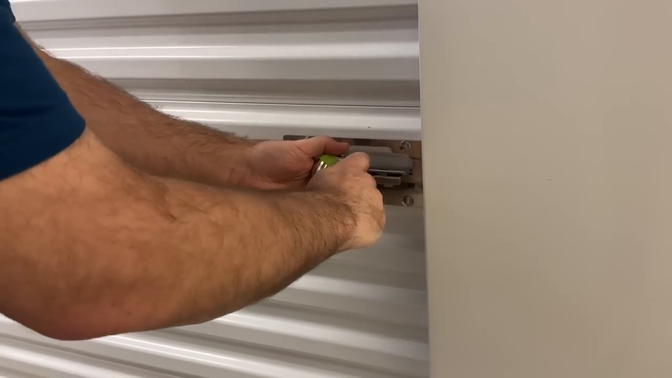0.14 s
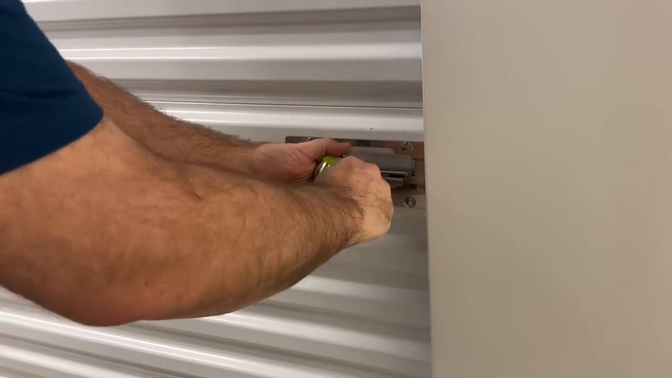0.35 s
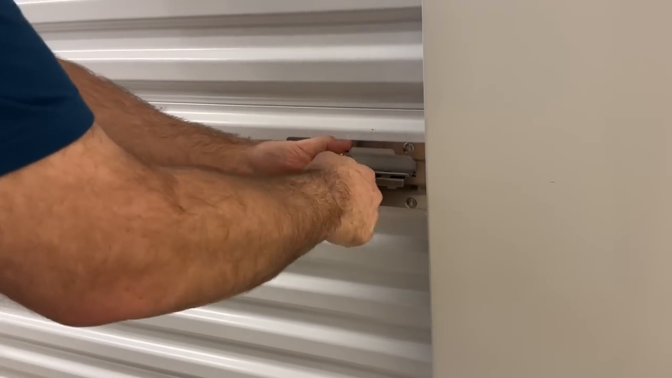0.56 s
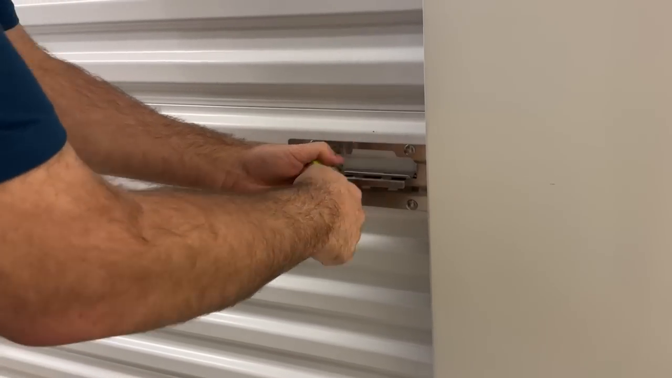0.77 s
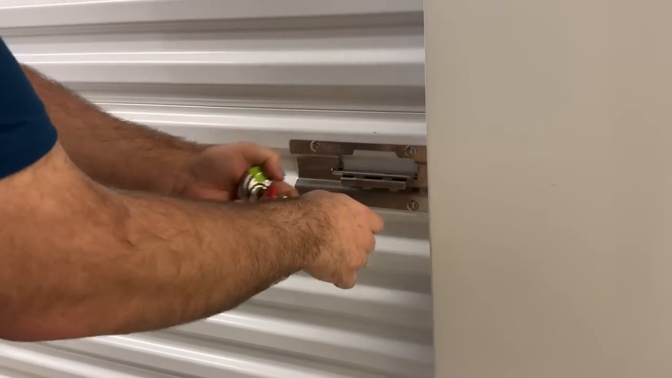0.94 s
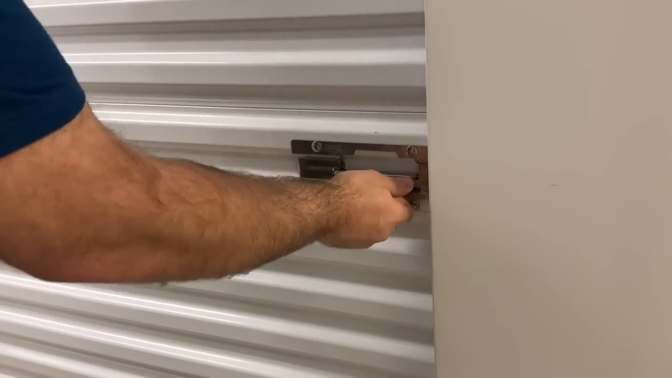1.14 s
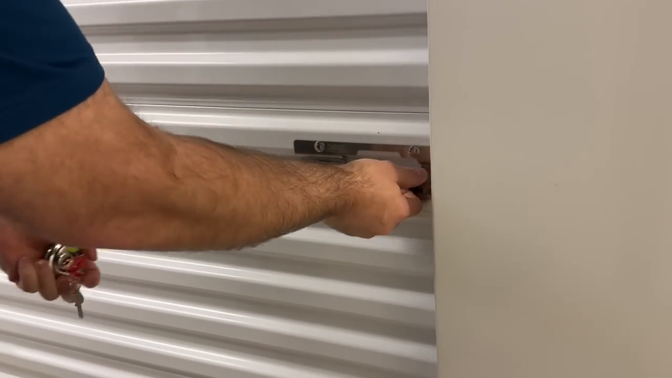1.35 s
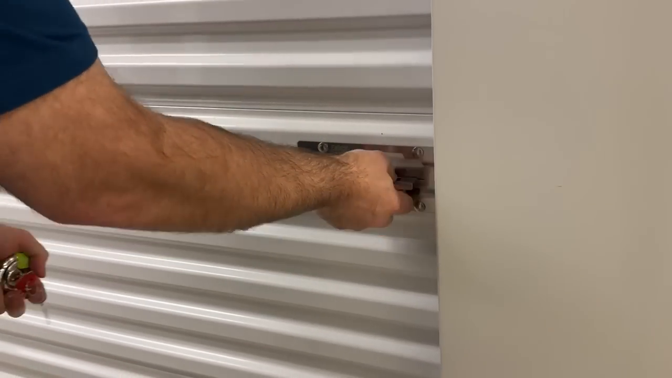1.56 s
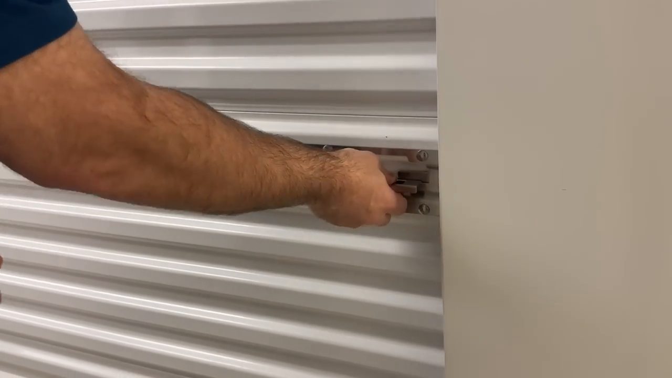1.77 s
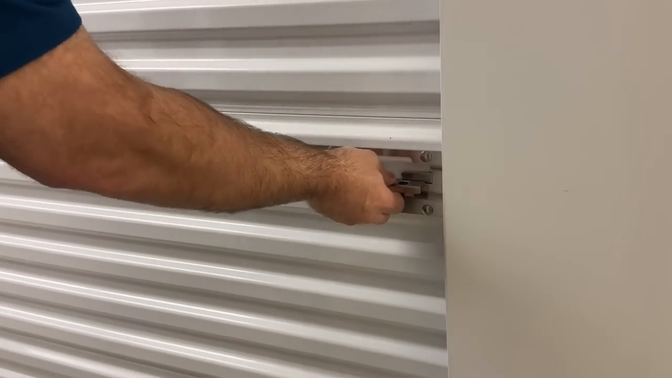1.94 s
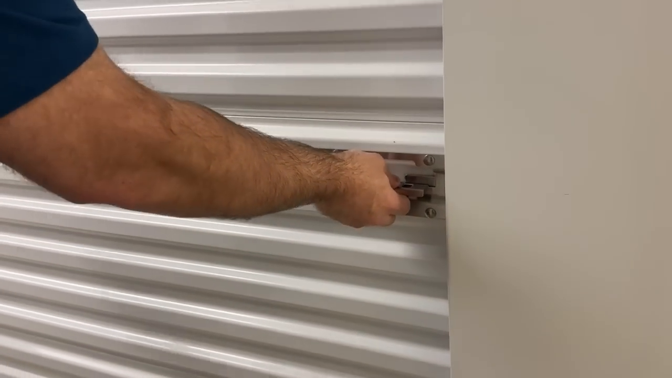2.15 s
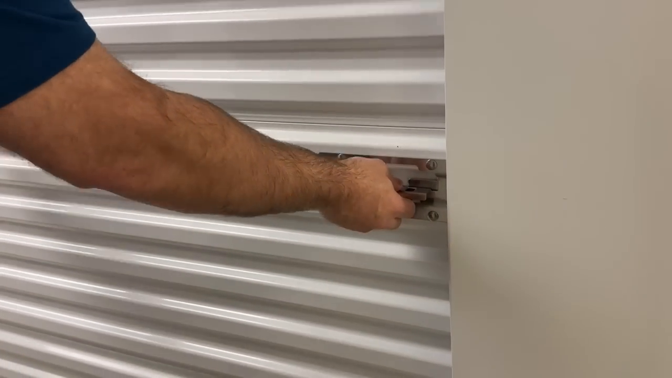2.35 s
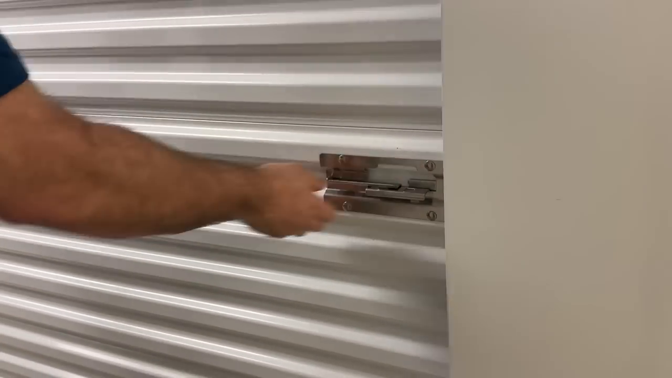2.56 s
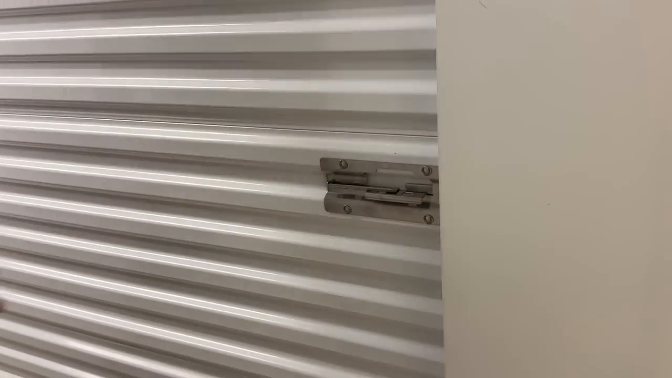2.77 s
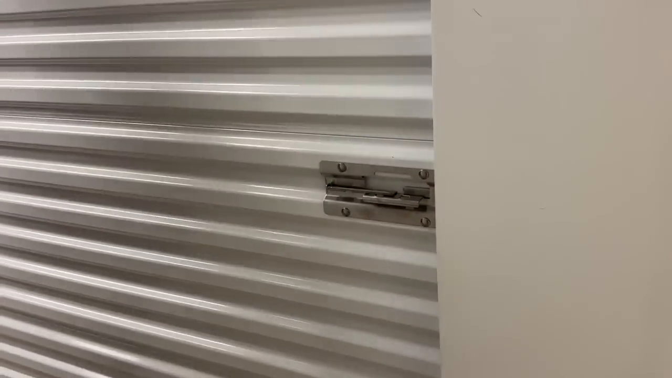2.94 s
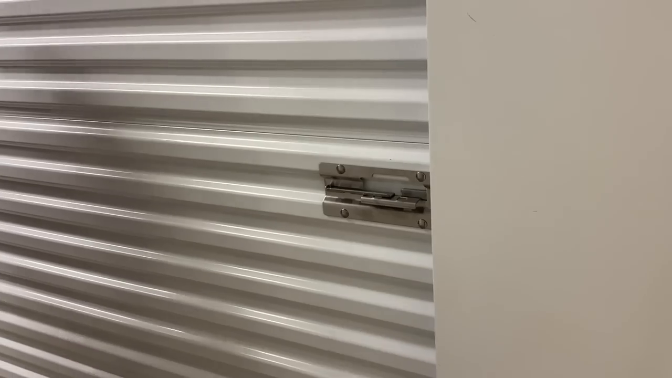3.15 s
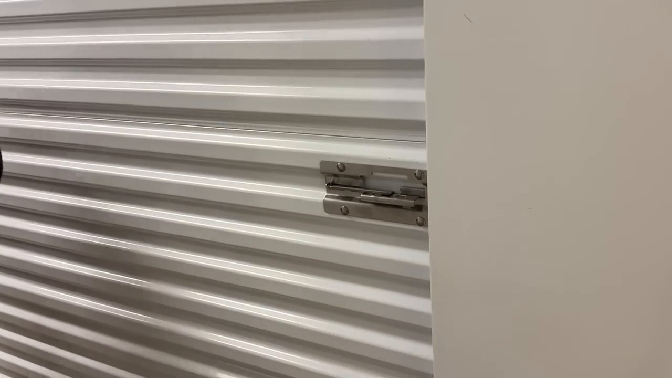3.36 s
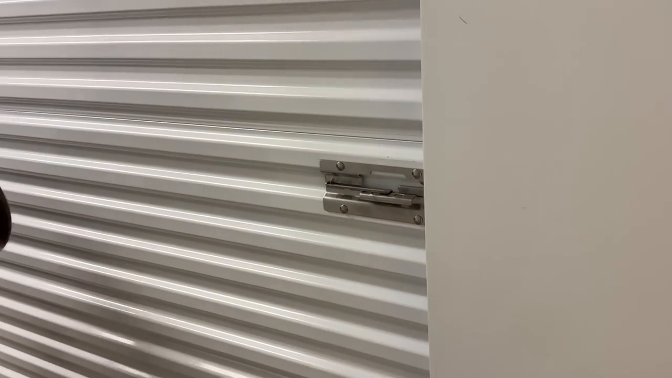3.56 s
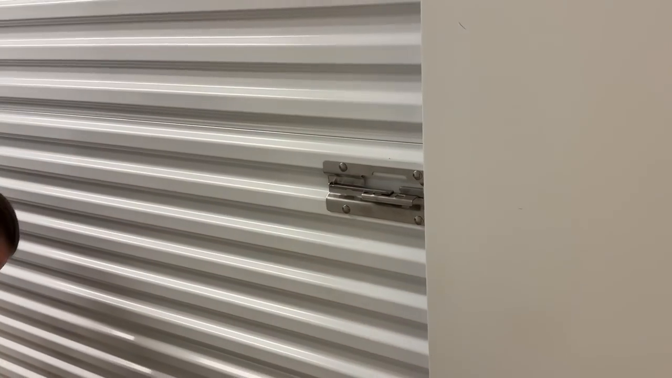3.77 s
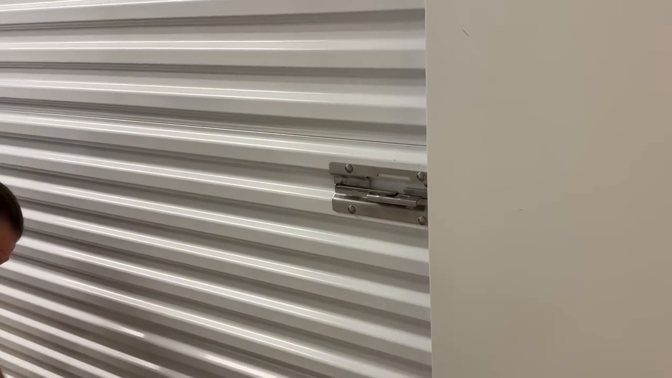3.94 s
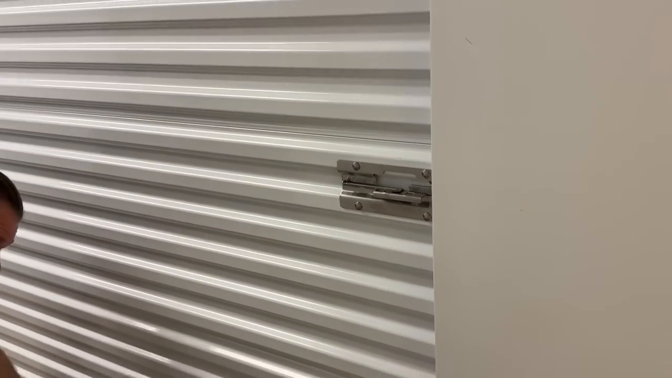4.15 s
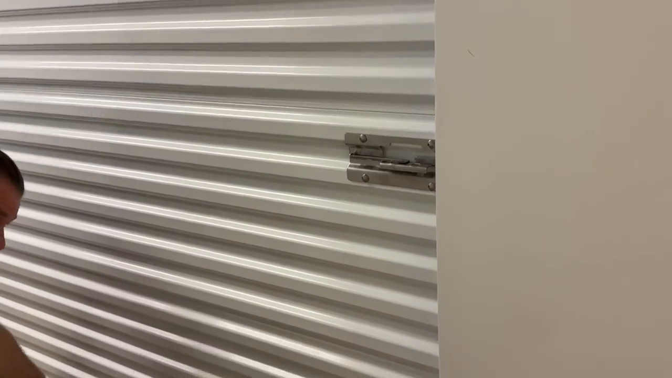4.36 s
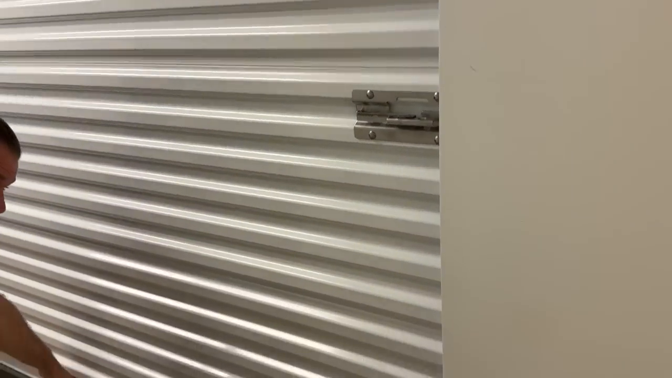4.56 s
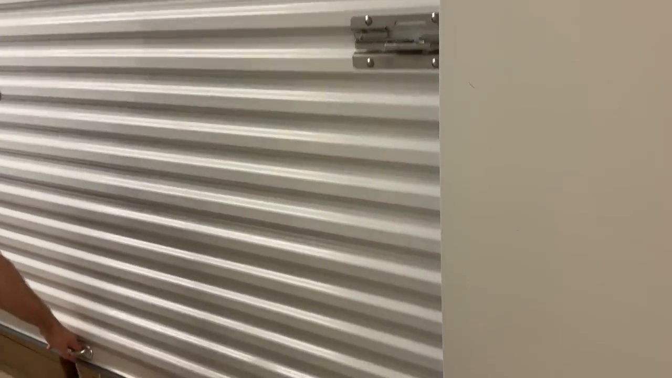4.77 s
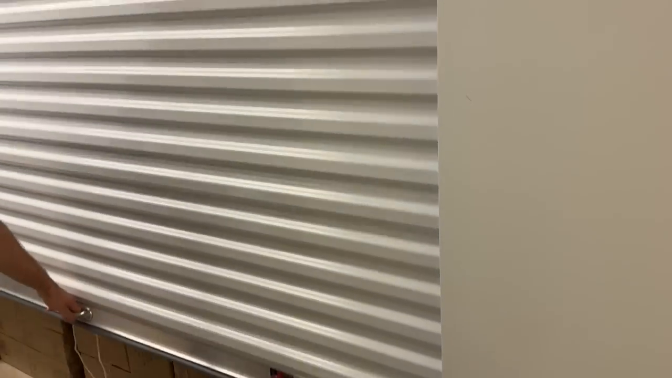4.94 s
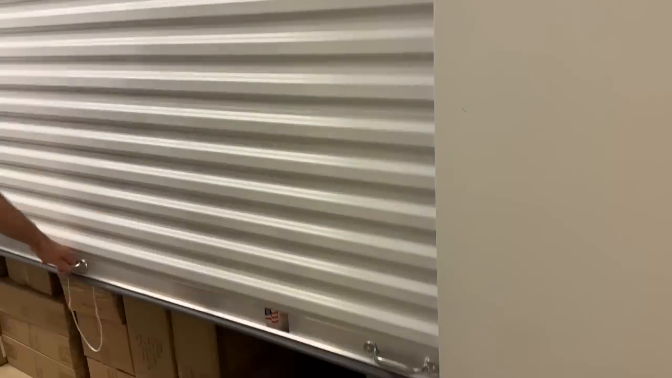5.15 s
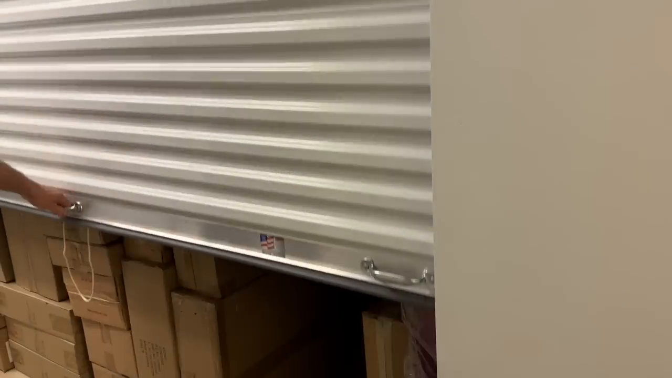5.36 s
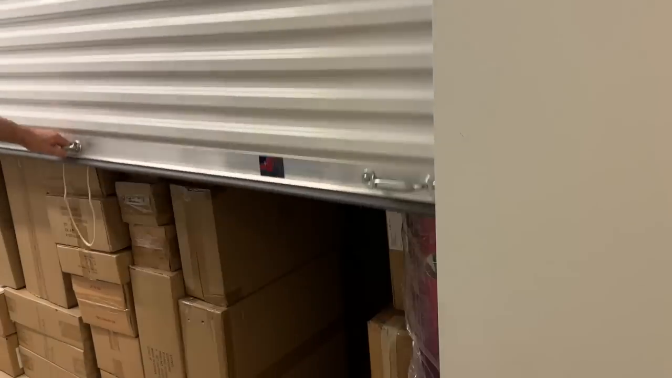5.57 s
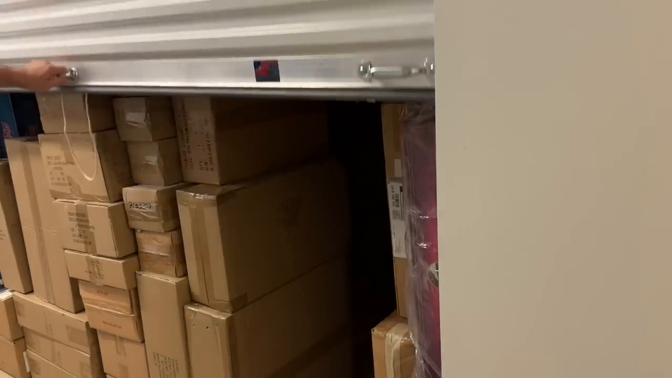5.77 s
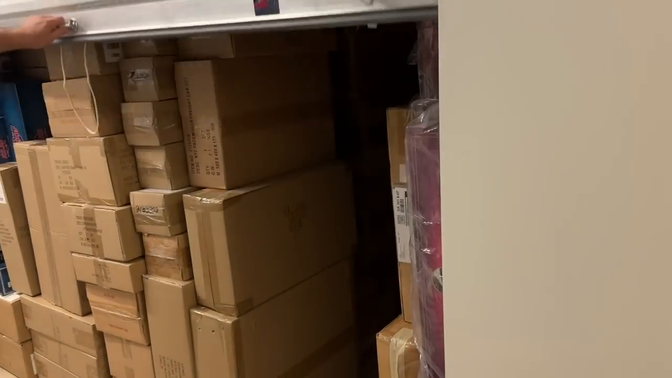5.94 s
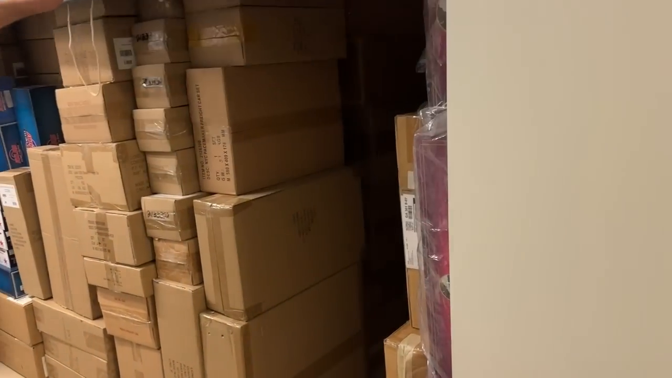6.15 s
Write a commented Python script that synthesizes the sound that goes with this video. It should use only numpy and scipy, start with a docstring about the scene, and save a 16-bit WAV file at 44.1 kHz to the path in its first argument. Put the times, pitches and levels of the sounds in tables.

```python
"""Over a ventilation hum, a padlock scrapes and clanks off its hasp and keys jingle in a hard corridor.
A faint tone lingers, the latch bolt slides back and a sleeve brushes; then the corrugated steel door is
pushed up and rumbles, knocks and hisses in its guides. Impact and sliding friction force the sheet to
vibrate, small metal parts ring in their normal modes, and the corridor reverberates. The two ports of
a small recorder hear the treble partly in opposite phase."""
import sys
import numpy as np
from scipy import signal
from scipy.fft import rfft, irfft, next_fast_len
from scipy.io import wavfile

SR = 44100
rng = np.random.default_rng(int(sys.argv[2]) if len(sys.argv) > 2 else 0)


def unload_audio(sound):
    """Save the sound as a 16-bit wav file, at the path given as the first command line argument."""
    columns = np.transpose(np.atleast_2d(sound))
    # keep every value between -1 and 1, then stretch to whole-number steps
    steps = np.round(np.clip(columns, -1, 1) * 32767)
    wavfile.write(sys.argv[1], SR, steps.astype(np.int16))


N = 273576

# ventilation noise: (frequency [Hz], relative spectral density [dB])
AIR_SPECTRUM = [(30, -14), (50, 7.5), (100, -2.5), (160, -6), (300, -21.5), (700, -22.5), (1500, -30.5),
                (3000, -37), (6000, -40), (9000, -39), (15000, -41.5)]
# the wavering hum: (time [s], level [dB])
HUM_LEVELS = [(0, -59), (.9, -58), (.96, -50.5), (1.88, -61), (2.05, -54), (2.13, -48.5), (3.27, -54.5),
              (3.42, -74), (4.0, -65)]

# the door's five zones, called boom, clank, clatter, tick and sheen:
# (low edge [Hz], high edge [Hz], ring t60 [s], ring energy [dB], corridor energy [dB], blow gain [dB])
ZONES = [(35, 350, .3, 3, 2, 21), (350, 1800, .12, 2, 0, 16), (1800, 4500, .12, 2, -2, 13),
         (4500, 10500, .1, 1, -4, 12), (10500, 17500, .07, 0, -6, 13)]
# colour of the steel sheet within each zone: (frequency [Hz], relative spectral density [dB])
SHEET_SPECTRUM = [(30, -12), (50, -1), (100, 3), (150, -3), (250, 1), (350, -5), (600, -3), (1000, -2),
                  (1600, -6), (2200, -13), (3100, -11), (4200, -15), (6500, -16), (9500, -17), (16000, -17)]
# reverberation time of the corridor: (frequency [Hz], t60 [s])
CORRIDOR_T60 = [(50, 1.6), (200, 1.9), (700, 1.2), (2000, 0.96), (4000, 0.62), (8000, 0.66), (15000, 0.13)]

# two slides, the shackle through the hasp and then the bolt:
# (time [s], clank level [dB], boom over clank [dB], hardness [dB])
LATCH_SLIDES = [
    [(0, -44.5, 7.5, -17), (.23, -76, 1, -9), (.276, -45, 6.5, -8), (.344, -49, 0, -5),
     (.374, -28, -16, -10.5), (.55, -65, -1, -30), (.68, -47.5, 3, -17), (.75, -51.5, -0.5, -4),
     (.9, -68.5, 8, -34)],
    [(1.405, -38.5, -1.5, -6), (1.47, -42.5, -1.5, -13.5), (1.53, -34.5, -14.5, -3.5),
     (1.565, -34, -19, -2.5), (1.6, -23.5, -19.5, -3), (1.66, -45, 5.5, -12)],
]
# blows on padlock, hasp and bolt:
# (time [s], clank level [dB], boom over clank [dB], clatter over clank [dB], tick over clank [dB])
LATCH_BLOWS = [(.059, -39, -23, -8, -22), (.234, -45, 4.5, -1, -7), (.268, -37, -3, -6, 8.5),
               (.292, -28, -3, -7, -10), (.349, -24, -10, 1.5, 4.5), (.357, -25, -9.5, -1, -11),
               (.367, -16, -6, -3, -0.5), (.557, -31.5, -1.5, 1.5, 4.5), (.737, -28.5, -15.5, -2.5, 2.5),
               (.752, -24, -19.5, -10, -14), (.847, -52.5, -5, -1, 12.5), (1.189, -54.5, -2.5, -15, 1),
               (1.409, -18, -26, -14, -0.5), (1.539, -22, -19.5, 3, -1), (1.574, -11.5, -27.5, 4, 5),
               (1.591, -12, -25, -4.5, -4), (1.629, -17.5, -24.5, -15.5, -16.5),
               (2.039, -39, -8.5, -6.5, -5), (2.447, -37, -6.5, -10, -30), (2.453, -30.5, -11, -8, -25),
               (2.46, -29, -9.5, -6, -14), (2.479, -29, -12.5, -5.5, -7), (2.654, -57, -2, -12, 7),
               (2.746, -43, -4.5, -4.5, -21), (3.425, -56, -10, -3, -3), (3.437, -55, -10, -3, -5)]
# modes of the latch plate: (frequency [Hz], level [dB], t60 [s])
LATCH_MODES = [(490, -7, .4), (720, -5, .3), (870, -3, .3), (1110, -2, .25), (1390, -2, .3),
               (2140, -10, .6), (2185, -8, .7), (2235, -9, .6), (2530, -5, .25), (2750, -2, .2),
               (3130, -2, .12), (3310, -4, .15), (3980, -5, .15), (4520, -8, .2)]
# keys touching, and padlock and bolt ticking: (time [s], level [dB], favoured frequency [Hz])
KEY_TOUCHES = [(.06, -56, 10000), (.185, -59, 14600), (.293, -35, 10000), (0.361, -24.5, 8840),
               (.39, -43, 13350), (2.804, -47.5, 10100), (2.894, -45, 14400), (2.922, -33, 7300),
               (2.949, -23, 7770), (2.972, -27.5, 7500)]
PADLOCK_TICKS = [(.234, -49, 3300), (.292, -34, 3100), (.365, -20.5, 3620), (.738, -33, 3940),
                 (.848, -39, 3150), (1.574, -15.5, 3616), (2.803, -56, 3600), (3.75, -60, 3600)]
# modes of the keys and of the padlock: (frequency [Hz], level [dB], t60 [s])
KEY_MODES = [(5850, -2, 0.11), (6120, -5, 0.37), (7320, -11, 0.13), (8800, 0.5, .12), (10010, -2.5, 0.1),
             (10840, -5, 0.18), (12370, -12, .12), (13300, -7, .08), (14610, 2, 0.17), (15500, -8, .09)]
PADLOCK_MODES = [(2800, -10, 0.065), (3156, 0, .06), (3460, -3.5, 0.044), (3870, -3.5, 0.055),
                 (4630, -16, 0.051)]

# knocks of the slats and the bottom bar:
# (time [s], clank level [dB], boom over clank [dB], clatter over clank [dB], tick over clank [dB])
SLAT_KNOCKS = [(3.738, -47, 6.5, -13, -20), (3.862, -50.5, -8.5, -18, -23), (3.953, -51, -14.5, -22, -20),
               (4.028, -37.5, -8, -10, 6), (4.036, -31.5, -17, -4, 11), (4.047, -32, -12, -7, 4),
               (4.08, -29, -4, 0, 10), (4.092, -28.5, -4, 1, 10.5), (4.116, -21.5, -7, -8, -5),
               (4.149, -31.5, -25, -10, 11), (4.202, -31.5, 2, -16, 9.5), (4.262, -29, -3, -10, 8),
               (4.317, -30.5, -12, -1, 7), (4.505, -20, -2.5, -15, -31), (4.669, -19, -2.5, -31, -28),
               (4.792, -22.5, -3, -23, -23), (4.919, -30, -20.5, 2, 1), (5.058, -22.5, -0.5, -16, -24),
               (5.194, -25, -15.5, -25, -27), (5.223, -19, -11, -24, -28), (5.261, -12.5, -5.5, -12.5, -12),
               (5.412, -19, -4, -17, -10), (5.53, -19, -9, -18, -12), (5.568, -19.5, -10, -14, -4),
               (5.6095, -8, -26, -14, -27), (5.662, -10.5, -8, -7.5, -19), (5.741, -24, -11, -23, -23),
               (5.863, -12.5, -24, -11, -5.5), (5.904, -14, -14, -26, -20), (5.99, -16.5, -7, -23, -7),
               (6.063, -16.5, -21, -30, -32), (6.0695, -10, -22, -32, -34), (6.2, -13, -30, -40, -35)]
# the door running up its guides: (time [s], clank level [dB], boom over clank [dB], hardness [dB])
ROLL_SLIDE = [(3.91, -79, 6, -22), (4.03, -48.5, 5.5, -8), (4.09, -40.5, -1.5, 2), (4.14, -47, 5, 2),
              (4.3, -42, 4.5, -0.5), (4.53, -35.5, -3, -14), (4.62, -40, -2, -7),
              (4.68, -33.5, -1.5, -11.5), (5.05, -35, -4, -7.5), (5.23, -30.5, 0.5, -14),
              (5.35, -29.5, -0.5, -8.5), (5.52, -35.5, -8, -9.5), (5.56, -30, -2, -3),
              (5.61, -20, -6, -6.5), (5.65, -25.5, -1, -11), (5.75, -21, -4, -14), (5.79, -29, 0, -15),
              (6.05, -37.5, -2.5, -5.5), (6.09, -25.5, -1.5, -16.5), (6.2, -59, 6, 0)]
# modes of the rolling slats, a slat snapping over and the edges: (frequency [Hz], level [dB], t60 [s])
SLAT_MODES = [(648, -2.5, 0.035), (818, -0.5, 0.024), (1010, 2.5, 0.012), (1122, -4, 0.036),
              (1683, -14, 0.091)]
SLAT_POP = [(960, -17.5, .013)]
EDGE_MODES = [(2580, -1, 0.023), (2924, 1.5, 0.026), (3055, 0, 0.027), (3350, -11, 0.016)]
# slat edges scraping along the guides: (start [s], length [s], level [dB])
EDGE_SCRAPES = [(4.915, 0.034, -38.5), (5.404, 0.036, -36), (5.561, 0.085, -30), (5.851, 0.041, -31.5)]

# relation of the two microphone ports: (frequency [Hz], phase lead of left [rad], coherence [0-1])
PORT_PHASE = [(0, 0, .999), (100, 0, .98), (200, .05, .88), (500, .3, .68), (1800, 1.1, .55),
              (2200, -.6, .5), (6000, -.8, .6), (7500, 0, .85), (7900, 0, .85), (8150, -3.14, .999),
              (9450, -3.14, .999), (9700, -1.8, .9), (10300, -1.6, .9), (10700, -.1, .97), (11700, 0, .99),
              (12100, 1.0, .85), (12500, 1.2, .85), (12900, 3.14, .999), (13800, 3.14, .999),
              (14100, 4.3, .9), (15200, 6.28, .99)]
# overall tone colour and left-right balance, with the treble cut off steeply at 16 kHz:
# (frequency [Hz], gain [dB], left over right [dB])
TONE_COLOUR = [(0, 0, 0), (500, 0, .5), (1800, 0, -2.5), (7500, 0, -2.2), (8200, 0, 0), (10000, -.5, 0),
               (10700, -5, 0), (12000, -8, 0), (13300, -5, 0), (14300, -1, 0), (15400, -2, 0),
               (15850, -2, 0), (16050, -22, 0)]

AIR_DB, HUM_HZ, HUM_WIDTH_HZ = -50.5, 117.2, 21
GRAINS_PER_S, RATTLES_PER_S = 1500, 400   # fine friction, coarse knocking
# a harder contact is brighter: (offset [dB], slope [dB per dB of hardness or tick])
LATCH_CLATTER, ROLL_CLATTER = (1.5, 0.9), (-7, 0.76)
LATCH_SHEEN, ROLL_SHEEN = (-0.26, 1.2), (1, 1.28)
LATCH_CONTACT_S, SLAT_CONTACT_S = .0012, 0.00064   # time constant of a blow
LATCH_SCATTER, SLAT_SCATTER = .9, .4   # amplitude of loose scatter in a blow of unit energy
LATCH_FREE_S, ROLL_START_S = 2.6, 4.3   # the hand leaves the latch; the slats begin to ring
LATCH_BOOM_LOW_HZ = 105   # blows near the frame move only a small patch of the sheet: no deep boom
COIL_DAMPING_DB_PER_S = 2   # the sheet rings less freely as it coils round the drum
CLINK_LOSS_DB_PER_OCTAVE, CLINK_DETUNE = 22, .03   # off the favoured frequency; relative mode spread
SHIVER_DEPTH, SHIVER_HZ = .5, 120   # touching neighbours make each clink shiver
CEILING, CUTOFF_HZ = .95, 17135   # peaks round off near full scale; the top treble is removed


def amp(db):
    """The decibel law: 20 dB is a factor of ten in amplitude."""
    return 10 ** (np.asarray(db) / 20)


def rms_one(x):
    """Normalisation to unit mean power."""
    return x / np.sqrt(np.mean(x ** 2) + 1e-20)


def in_time(rows, silent=False):
    """Linear interpolation of each column in time; with silent, the first vanishes outside the table."""
    times, *columns = np.transpose(rows)
    t = np.arange(N) / SR
    out = [np.interp(t, times, column) for column in columns]
    if silent:
        out[0] = np.interp(t, times, columns[0], left=-200, right=-200)
    return out


def at_hz(points, hz):
    """Interpolation on a logarithmic frequency axis."""
    frequencies, values = np.transpose(points)
    return np.interp(np.log(hz), np.log(frequencies), values)


def band(x, low_hz, high_hz):
    """Butterworth band-pass filtering."""
    return signal.sosfilt(signal.butter(2, [low_hz, high_hz], "band", fs=SR, output="sos"), x)


def fade(t, t60):
    """Exponential decay: 60 dB in t60 seconds."""
    return np.exp(-np.log(1000) * t / t60)


def ventilation():
    """Broadband noise plus a hum; narrow-band noise beats with the hum's tone and roughens it."""
    hz = np.fft.rfftfreq(N, 1 / SR) + 1
    air = irfft(rfft(rng.standard_normal((2, N))) * amp(at_hz(AIR_SPECTRUM, hz)), N)
    peak = 1 / (1 + (2 * (hz - HUM_HZ) / HUM_WIDTH_HZ) ** 2)
    rough = irfft(rfft(rng.standard_normal((2, N))) * peak, N)
    hum = rms_one(.6 * rms_one(rough) + np.sin(2 * np.pi * HUM_HZ * np.arange(N) / SR))
    return amp(AIR_DB) * rms_one(air) + amp(in_time(HUM_LEVELS)[0]) * hum


def grains(per_s, spread_db=4):
    """Shot noise: random clicks of uneven size, with independent signs in two versions."""
    sizes = amp(spread_db * np.minimum(rng.exponential(1, N), 4))
    occurs = rng.random(N) < per_s / SR
    return rms_one(sizes * occurs * rng.choice([-1, 1], (2, N)))


def zone_levels(clank_db, boom_db, clatter_db, tick_db, sheen):
    """Spectral envelope of a contact over the five zones, in dB; the sheen follows the tick."""
    sheen_db = sheen[0] + sheen[1] * tick_db
    return clank_db + np.array([boom_db, np.zeros_like(tick_db), clatter_db, tick_db, sheen_db])


def sliding_force():
    """Sliding friction is a stream of tiny impacts; coarser rattles join in the clank and clatter zones."""
    fine, coarse = grains(GRAINS_PER_S), grains(RATTLES_PER_S)
    stream = np.array([0.84 * fine, 0.6 * fine + 0.62 * coarse, 0.93 * fine + 0.45 * coarse, fine, fine])
    slides = [(rows, LATCH_CLATTER, LATCH_SHEEN) for rows in LATCH_SLIDES]
    slides.append((ROLL_SLIDE, ROLL_CLATTER, ROLL_SHEEN))
    force = np.zeros((5, 2, N))
    for rows, clatter, sheen in slides:
        clank_db, boom_db, hardness_db = in_time(rows, silent=True)
        clatter_db = clatter[0] + clatter[1] * hardness_db
        force += amp(zone_levels(clank_db, boom_db, clatter_db, hardness_db, sheen))[:, None] * stream
    return force


def impact_force(blows, contact_s, scatter, sheen):
    """An impact divides its energy between one clean impulse and a short, loose scatter."""
    t = np.arange(2000) / SR
    force, blow_gain_db = np.zeros((5, 2, N)), np.array(ZONES)[:, 5]
    for start_s, *levels in blows:
        noise = rng.standard_normal((2, len(t)))
        burst = noise * t * np.exp(-t / contact_s)
        burst *= scatter / np.sqrt(np.sum(burst ** 2, axis=1, keepdims=True))
        burst[:, 0] = np.sqrt(1 - scatter ** 2) * np.sign(noise[:, 0])
        gains = amp(zone_levels(*levels, sheen) + blow_gain_db)
        at = round(start_s * SR)
        force[..., at:at + len(t)] += (gains[:, None, None] * burst)[..., :N - at]
    return force


def stored_energy(power, t60):
    """Energy balance: a reverberant system gathers power and drains by 60 dB in t60 seconds."""
    retained = fade(2 / SR, t60)
    return signal.lfilter([1 - retained], [1, -retained], power + 1e-18)


def sheet(force, low_hz, high_hz, ring_t60, ring_db, corridor_db):
    """Direct sound plus diffuse field: dense modes of sheet and corridor act as decaying noise."""
    edges = np.geomspace(low_hz, high_hz, 2 + int(2.5 * np.log2(high_hz / low_hz)))
    centres = np.sqrt(edges[1:] * edges[:-1])
    gains = amp(at_hz(SHEET_SPECTRUM, centres))
    gains /= np.sqrt(np.sum(gains ** 2 * np.diff(edges)) * 2 / SR)   # a white force keeps its power
    rolled_s = np.maximum(np.arange(N) / SR - ROLL_START_S, 0)
    power = np.mean(force ** 2, axis=0) * amp(-2 * COIL_DAMPING_DB_PER_S * rolled_s)
    ring = amp(2 * ring_db) * stored_energy(power, ring_t60)
    white, out = rng.standard_normal((2, 2, N)), 0
    for k, hz in enumerate(centres):
        corridor = amp(2 * corridor_db) * stored_energy(power, at_hz(CORRIDOR_T60, hz))
        diffuse = np.sqrt(ring + corridor) * white[k % 2]
        out += gains[k] * band(force + diffuse, edges[k], edges[k + 1])
    return out


def resonate(modes, force, gate):
    """Forced resonance: each mode is a damped oscillator driven by the clank or the clatter zone."""
    out = 0
    for hz, db, t60 in modes:
        radius, angle = fade(1 / SR, t60), 2 * np.pi * hz / SR
        drive = force[1 if hz < ZONES[1][1] else 2] * gate + 1e-18
        feedback = [1, -2 * radius * np.cos(angle), radius ** 2]
        out += amp(db) * signal.lfilter([0, np.sin(angle)], feedback, drive)
    return out


def door():
    """Forced vibration: slides and blows drive the sheet, early ones the latch plate, late ones slats."""
    slides = sliding_force()
    blows = impact_force(LATCH_BLOWS, LATCH_CONTACT_S, LATCH_SCATTER, LATCH_SHEEN)
    blows += impact_force(SLAT_KNOCKS, SLAT_CONTACT_S, SLAT_SCATTER, ROLL_SHEEN)
    t, force = np.arange(N) / SR, slides + blows
    unlatching, rolling = t < LATCH_FREE_S, t > ROLL_START_S
    upper_zones = sum(sheet(part, *zone[:5]) for part, zone in zip(force[1:], ZONES[1:]))
    latch_boom = sheet(force[0] * unlatching, LATCH_BOOM_LOW_HZ, *ZONES[0][1:5])
    deep_boom = sheet(force[0] * ~unlatching, *ZONES[0][:5])
    latch_plate = amp(-30) * resonate(LATCH_MODES, force, unlatching)
    pops = resonate(SLAT_POP, blows, rolling)
    slats = amp(-19) * band(resonate(SLAT_MODES, force, rolling), 596, 1750)
    return upper_zones + latch_boom + deep_boom + latch_plate + pops + slats


def free_ring(modes, t):
    """Free vibration is a sum of damped sinusoids; the two versions start in different phases."""
    return sum(amp(db) * fade(t, t60) * np.sin(2 * np.pi * (hz * t + rng.random((2, 1))))
               for hz, db, t60 in modes)


def clinks(touches, modes, halo_db, knock_db):
    """Struck metal rings in clusters of close modes that beat, with a bright halo and a dull knock."""
    out, t = np.zeros((2, N)), np.arange(SR // 3) / SR
    envelope = (1 - fade(t, 0.0025)) * np.cos(np.pi * t / t[-1] / 2)   # the hand closes round the metal
    for start_s, db, favoured_hz in touches:
        clusters = []
        for hz, mode_db, t60 in modes:
            excited_db = mode_db - CLINK_LOSS_DB_PER_OCTAVE * abs(np.log2(hz / favoured_hz))
            clusters += [(hz * (1 + CLINK_DETUNE * offset), excited_db, t60 / (1 + offset ** 2))
                         for offset in rng.standard_normal(5)]
        white = rng.standard_normal((2, 2, len(t)))
        halo = amp(halo_db) * fade(t, 0.27) * band(white[0], favoured_hz / 1.14, min(favoured_hz * 2, 15500))
        knock = amp(knock_db) * fade(t, 0.26) * band(white[1], 1200, 3900)
        shiver = rms_one(band(rng.standard_normal(len(t)), 15, SHIVER_HZ))
        ring = free_ring(clusters, t) * rms_one(1 + SHIVER_DEPTH * shiver)
        at = round(start_s * SR)
        out[:, at:at + len(t)] += amp(db) * (ring + halo + knock) * envelope
    return out


def faint_ring(start_s=.92, hz=1310, width_hz=70, db=-57, length_s=.31):
    """Beating with narrow-band noise roughens a faint tone that lingers once the padlock is free."""
    t = np.maximum(np.arange(N) / SR - start_s, 0)
    rough = rms_one(band(rng.standard_normal((2, N)), hz - width_hz / 2, hz + width_hz / 2))
    tone = np.sin(2 * np.pi * (hz * t + rng.random((2, 1))))
    envelope = (1 - fade(t, .08)) * fade(t, 2.0) * np.exp(-(t / length_s) ** 6)
    return amp(db) * envelope * rms_one(.7 * rough + tone)


def sleeve_brush(peak_s=3.16, hiss_db=-43, rise_s=0.035, t60=0.24):
    """Friction noise of a sleeve on cloth: a soft hiss with a duller body."""
    t = np.arange(N) / SR - peak_s
    envelope = np.where(t < 0, np.exp(-(t / rise_s) ** 2), fade(np.abs(t), t60))
    hiss = rms_one(band(rng.standard_normal((2, N)), 5200, 14000))
    body = amp(-8) * rms_one(band(rng.standard_normal((2, N)), 420, 2100))
    return amp(hiss_db) * envelope * (hiss + body)


def edge_scrapes(rise_s=0.0036):
    """Friction in the guides excites the modes of the slat edges in short strokes."""
    t, strokes = np.arange(N) / SR, 0
    for start_s, length_s, db in EDGE_SCRAPES:
        age = np.maximum(t - start_s, 0)
        strokes += amp(db) * np.minimum(age / rise_s, 1) * np.exp(-(age / length_s) ** 3)
    friction = np.broadcast_to(grains(GRAINS_PER_S), (3, 2, N))
    steady_rms = np.sqrt(np.mean(resonate(EDGE_MODES, friction, 1) ** 2))
    return resonate(EDGE_MODES, friction, strokes) / steady_rms


def scene():
    """Superposition of all sources, in two largely uncorrelated versions of the sound field."""
    keys = clinks(KEY_TOUCHES, KEY_MODES, halo_db=-4.5, knock_db=-11.5)
    padlock = clinks(PADLOCK_TICKS, PADLOCK_MODES, halo_db=-10, knock_db=-18.5)
    return door() + edge_scrapes() + keys + padlock + sleeve_brush() + faint_ring() + ventilation()


def record(dry):
    """Partial coherence: the ports share one version and differ by the other, and in phase and gain."""
    size = next_fast_len(N + 4096)
    hz = np.fft.rfftfreq(size, 1 / SR)
    port_hz, *port_columns = np.transpose(PORT_PHASE)
    lead, coherence = [np.interp(hz, port_hz, column) for column in port_columns]
    colour_hz, *colour_columns = np.transpose(TONE_COLOUR)
    gain_db, balance_db = [np.interp(hz, colour_hz, column) for column in colour_columns]
    shared, difference = rfft(dry, size) * amp(gain_db) / np.sqrt(2)
    side = np.array([[1], [-1]])   # left, right
    ports = np.sqrt(1 + coherence) * shared + side * np.sqrt(1 - coherence) * difference
    ports *= amp(side * balance_db / 2) * np.exp(.5j * side * lead)
    stereo = irfft(ports, size)[:, :N]
    rounded = stereo / (1 + (stereo / CEILING) ** 4) ** .25   # soft saturation of the peaks
    return signal.sosfilt(signal.cheby2(12, 70, CUTOFF_HZ, fs=SR, output="sos"), rounded)


dry = scene()
out = record(dry)
unload_audio(out)
```